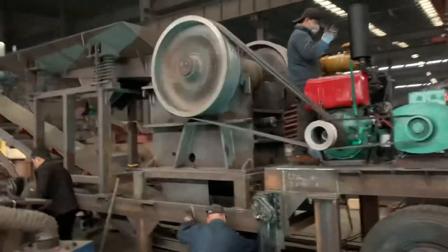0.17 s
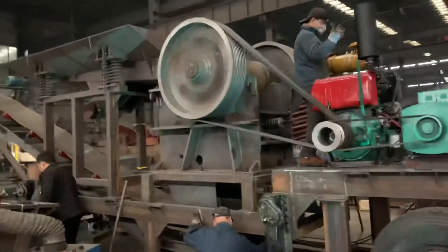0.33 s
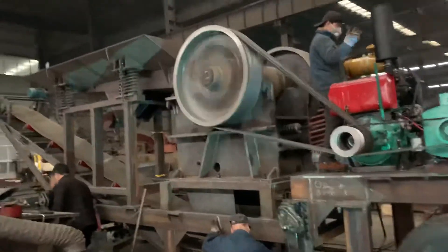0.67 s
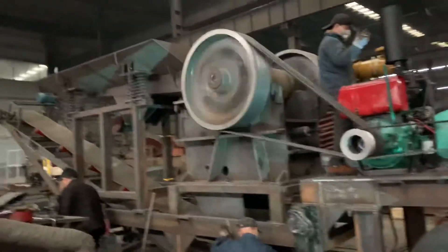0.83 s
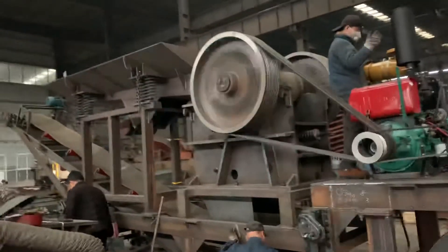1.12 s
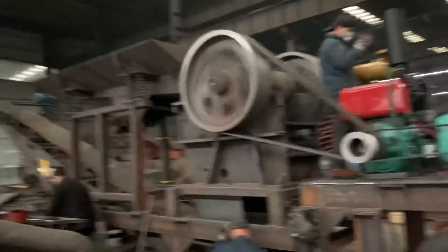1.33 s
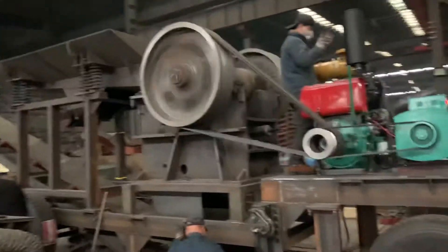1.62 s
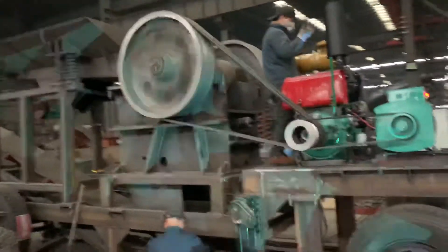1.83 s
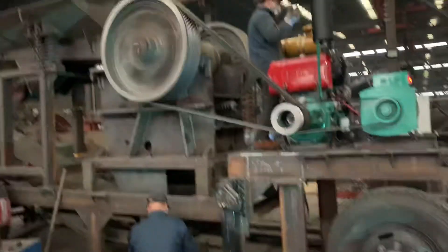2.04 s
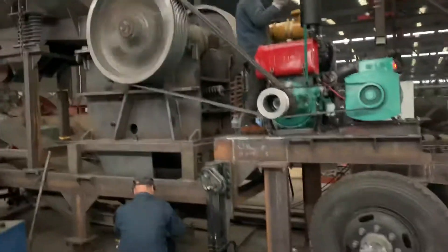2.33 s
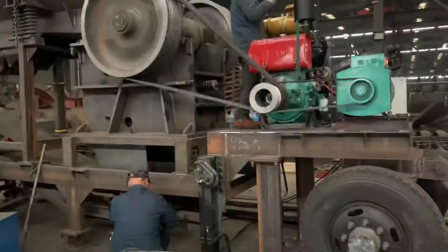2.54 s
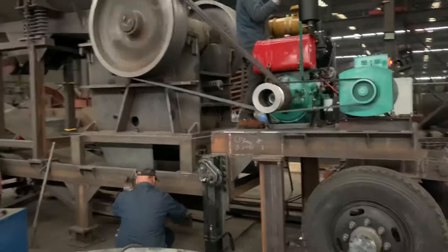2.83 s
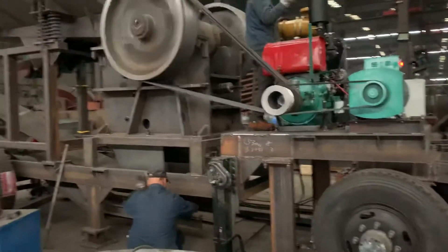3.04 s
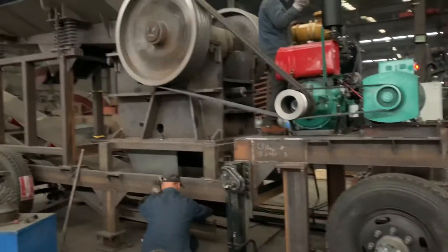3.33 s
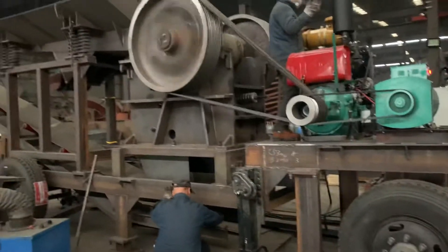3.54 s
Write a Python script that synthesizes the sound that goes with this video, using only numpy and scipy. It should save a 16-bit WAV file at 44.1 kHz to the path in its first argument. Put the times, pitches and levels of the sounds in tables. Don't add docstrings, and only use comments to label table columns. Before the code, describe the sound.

Continuous diesel knocking, valve clatter, motor hum and humming steel plates fill a large workshop; nearby a loose metal part crackles densely at first, falls quiet, snaps again after two seconds, then stops.

```python
import sys
import numpy as np
from scipy import signal
from scipy.fft import rfft, irfft
from scipy.io import wavfile

SR = 44100
rng = np.random.default_rng(int(sys.argv[2]) if len(sys.argv) > 2 else 0)


def persist_wave(psi):
    counts = np.round(np.clip(psi, -1, 1) * 32767).astype(np.int16)
    wavfile.write(sys.argv[1], SR, np.atleast_2d(counts).T)


def attenuation_scalar(level_db):
    decades = np.asarray(level_db, float) / 20
    return 10 ** decades


N = 162288
CYCLE_HZ = 9.821


def rms_one(x):
    return x / np.sqrt(np.mean(x ** 2) + 1e-20)


def in_time(rows):
    return np.interp(np.arange(N) / SR, *np.transpose(rows))


def at_hz(points, hz):
    table_hz, value = np.array(points).T
    return np.interp(np.log(hz + 1), np.log(table_hz + 1), value)


def drift(rate_hz):
    r = np.exp(-80 * np.pi * rate_hz / SR)
    slow = signal.lfilter([1], [1, -2 * r, r * r], rng.standard_normal(N // 40 + 2002))[2000:]
    return np.interp(np.arange(N) / 40, np.arange(len(slow)), rms_one(slow))


def colour(white, points):
    hz = np.arange(N // 2 + 1) * SR / N
    octaves_outside = np.abs(np.log2(np.clip(hz + 1, points[0][0], points[-1][0]) / (hz + 1)))
    gain = attenuation_scalar(at_hz(points, hz) - 120 * octaves_outside) * np.sqrt(SR / 2)
    return irfft(rfft(white) * gain, N)


def resonate(x, hz, width_hz):
    r = np.exp(-np.pi * width_hz / SR)
    poles = [1, -2 * r * np.cos(2 * np.pi * hz / SR), r * r]
    return signal.lfilter([(1 - r * r) / 2, 0, (r * r - 1) / 2], poles, x + 1e-18)


def die_away(x, t60_s):
    return signal.lfilter([1], [1, -attenuation_scalar(-60 / (t60_s * SR))], x + 1e-18)


def tones(base_hz, rows, turn):
    t = np.arange(N) / SR
    out = np.zeros(N)
    for multiple, rms_db, db_per_s in rows:
        level_db = rms_db + db_per_s * (t - t.mean()) + 0.8 * drift(1)
        phase = 2 * np.pi * np.round(multiple) * (base_hz * t + turn)
        out += np.sqrt(2) * attenuation_scalar(level_db) * np.sin(phase)
    return out


CYLINDER_DB = [3.5, 0, 1, -3.5]


def firings():
    first_s, jitter_db = .091, 2
    k = np.arange(int((N / SR + 1 - first_s) * CYCLE_HZ * 4))
    at = ((k / CYCLE_HZ / 4 + first_s) * SR).astype(int)
    out = np.zeros((4, N + SR))
    out[k % 4, at] = attenuation_scalar(np.array(CYLINDER_DB)[k % 4] + jitter_db * rng.standard_normal(len(k)))
    return out


def gated_noise(fire, spectrum, share):
    puff_s, patchy_db = 0.016, .6
    r = np.exp(-1 / (puff_s * SR))
    puff = signal.lfilter([1], [1, -r], fire.sum(axis=0))[SR:]
    gain = (1 - share + share * puff / puff.mean()) * attenuation_scalar(patchy_db * drift(3.1))
    return colour(rms_one(gain * rng.standard_normal((2, N))), spectrum)


# frequency in Hz, level in dB per Hz.
ROAR = [(33, -56), (68, -56), (82, -45), (165, -47), (200, -47), (380, -53.5), (520, -56), (1350, -61)]


def roar(fire):
    return gated_noise(fire, ROAR, share=0.017)


# multiple of the motor rate, rms level in dB, change in dB per second.
HUM = [(1, -36.5, 1.7), (2, -30.5, 0), (3, -42, 1), (5, -41.5, -0.5)]


def motor_hum():
    return -tones(49.73, HUM, turn=.2)


# frequency in Hz, width in Hz, rms level in dB.
PLATES = [(144.6, 5.4, -42), (304, 29, -35), (348.7, 6.5, -38.5), (541.7, 17.5, -38.5), (631, 22, -43),
          (709, 20, -39.5), (787.5, 6.9, -38), (1021, 63, -38.5), (1137, 9, -42.5), (1187, 8.3, -41.5),
          (1302, 31, -37), (1407, 3.3, -48), (1710, 110, -47.5), (2290, 110, -43.5)]


def plates():
    shake = rng.standard_normal((2, N))
    out = np.zeros((2, N))
    for hz, width_hz, rms_db in PLATES:
        wide_hz = width_hz * 1.7
        hum = resonate(resonate(shake, hz, wide_hz), hz, wide_hz)
        out += attenuation_scalar(rms_db - 0.5 * drift(0.88)) * rms_one(hum)
    return out


# multiple of the engine cycle, rms level in dB, change in dB per second.
EXHAUST = [(4, -41, 0.5), (8, -36, -0.5), (12, -29, 1.2), (14, -36.5, -2), (15, -38, 4), (16, -32.5, -0.2),
           (20, -39.5, 3), (32, -43, -1), (36, -39, -2.1), (38, -40.5, 0), (45, -44.5, -1), (56, -38.5, 1),
           (60, -38, 0.5)]


def exhaust():
    return tones(CYCLE_HZ, EXHAUST, turn=.1145)


# frequency in Hz, level in dB per Hz.
KNOCK = [(120, -60), (300, -58.5), (600, -58.5), (1300, -57.5), (1550, -64.5), (2300, -66), (3000, -68.5),
         (5000, -90)]


def knock(fire):
    hall_t60_s, direct_db, shared_path = 0.93, -13, 0.22
    t = np.arange(SR) / SR
    own = rng.standard_normal((2, 4, SR))
    shared = shared_path * rng.standard_normal((2, 1, SR))
    echo = (own + shared) * attenuation_scalar(-60 * t / hall_t60_s)
    echo /= np.sqrt(np.sum(echo ** 2, axis=2, keepdims=True))
    echo[..., 0] += attenuation_scalar(direct_db)
    ringing = signal.fftconvolve(fire[None], echo, axes=2).sum(axis=1)
    return colour(rms_one(ringing[:, SR:SR + N]), KNOCK)


# frequency in Hz, level in dB per Hz.
CLATTER = [(1350, -62), (1550, -61.5), (2300, -62), (2900, -68.5), (4500, -74.5), (5900, -82.5),
           (8200, -82), (15500, -89)]


def clatter(fire):
    return gated_noise(fire, CLATTER, share=0.25)


# start in seconds, pitch in Hz, peak level in dB.
PINGS = [
    (.641, 3800, -23),
    (2.227, 7700, -36),
    (2.85, 3700, -29),
    (.876, 3600, -31),
]


def pings():
    t = np.arange(N) / SR
    out = np.zeros(N)
    for s, hz, peak_db in PINGS:
        fade = attenuation_scalar(peak_db - 60 * np.maximum(t - s, 0) / .04)
        out += (t > s) * fade * np.sin(2 * np.pi * hz * (t - s))
    return out


# frequency in Hz, width in Hz, level in dB.
SNAP_RINGS = [(7520, 2200, -3), (8500, 530, 5), (9800, 1700, 4.5), (11500, 1500, -2.5), (12800, 2300, -8),
              (15000, 810, -12)]
# time in seconds, rms level in dB.
SIZZLE = [(0, -40.5), (.3, -50), (.36, -41), (.66, -43), (.95, -53), (1.15, -42), (1.3, -56), (2.05, -55),
          (2.25, -46), (2.28, -39), (2.37, -33), (2.5, -60), (2.6, -70)]


def sizzle():
    contacts_per_s = 2300
    sizes = attenuation_scalar(2.5 * np.minimum(rng.exponential(1, N), 4)) * (rng.random(N) < contacts_per_s / SR)
    grit = (sizes + 0.15) * rng.standard_normal((2, N))
    out = attenuation_scalar(-3) * resonate(grit, 13200, 3500)
    for k, (hz, width_hz, db) in enumerate(SNAP_RINGS):
        out += (-1) ** k * attenuation_scalar(db) * resonate(grit, hz, width_hz)
    return attenuation_scalar(in_time(SIZZLE)) * rms_one(out)


# start in seconds, peak level in dB, pitch in Hz.
THUDS = [(0.396, -17, 3000), (0.519, -21, 3300), (0.6021, -8, 2680), (0.6072, -13, 3000),
         (.8985, -26, 2800), (1.193, -26, 2800), (1.229, -19, 3800), (2.0636, -9.5, 3670),
         (2.066, -16, 3300), (2.1035, -24, 3500), (2.298, -23, 3500)]


def thuds():
    width_hz, rattle_t60_s, rattle_gain = 2400, .03, .3
    t = np.arange(SR // 20) / SR
    out = np.zeros((2, N))
    for s, peak_db, hz in THUDS:
        rattle = rattle_gain * attenuation_scalar(-60 * t / rattle_t60_s) * rng.standard_normal((2, len(t)))
        blow = (t == 0) * SR / (2 * np.pi * width_hz) + rattle
        ring = resonate(resonate(blow, hz, width_hz), hz, 2 * width_hz)
        start = int(s * SR)
        out[:, start:start + len(t)] += 2 * attenuation_scalar(peak_db) * ring
    return out


# start in seconds,
# peak level in dB, low modes in dB, high modes in dB, tail in dB (all three against the peak).
SNAPS = [(0.0087, -29, -5, -7, -18), (0.0605, -20, -9, -8, -16), (0.0763, -5.5, -6, -8, -31),
         (0.0812, -32, -4, 3, -16), (0.0873, -27, -4, -2, -16), (0.2015, -25.5, -10, -11, -19),
         (0.2427, -17, -6, -7, -23), (0.2695, -13, -12, -11, -21), (0.2756, -33, -10, -3, -14),
         (0.3149, -16, -6, -11, -23), (0.3494, -25, 8, -10, -12), (0.362, -12, 0, -8, -19),
         (0.3722, -26, -6, -4, -14), (0.3991, -9.5, 1, -10, -20), (0.4049, -26, -4, -8, -16),
         (0.4122, -27, -6, -4, -16), (0.471, -30, -5, -9, -16), (0.4872, -12, -8, -8, -23),
         (0.4936, -28, -1, -4, -16), (0.5208, -7.5, 0, -8, -17), (0.527, -26, 2, -4, -16),
         (0.5344, -24, -4, -12, -16), (0.5429, -34, -3, -6, -16), (0.6047, -9.5, 4, -9, -17),
         (0.6106, -26, 2, -8, -14), (0.6182, -28, -4, -8, -9), (0.6885, -26, -6, -11, -14),
         (0.7105, -21, -9, -8, -16), (0.7219, -26, -5, -15, -16), (0.7334, -31, -1, -10, -16),
         (0.7385, -15.5, -11, -10, -27), (0.771, -28, -9, -7, -19)]
LATE_SNAPS = [(0.8801, -28, -12, -7, -16), (0.9002, -15.5, -12, -6, -17), (0.9906, -29, -9, -8, -16),
              (1.0121, -27, -8, -12, -16), (1.0254, -19.5, -14, -10, -21), (1.0476, -17, -11, -9, -24),
              (1.0987, -15.5, -15, -6, -22), (1.1121, -19, -7, -10, -21), (1.1296, -20, -6, -9, -24),
              (1.1574, -18.5, -7, -11, -25), (1.1953, -6.5, -18, -8, -27), (1.2075, -23, -7, -5, -14),
              (1.2313, -11.5, -13, -10, -24), (2.0659, -8.5, 5.5, -1, -13), (2.0713, -26, 0, 3, -18),
              (2.0789, -22, -10, -12, -14), (2.1038, -25, 5, -2, -8), (2.2324, -36, 3, -9, -16),
              (2.2656, -26, 4, -5, -14), (2.2993, -22, 0, -1, -13), (2.3161, -27, -4, 0, -14),
              (2.3269, -27, -1, -4, -12), (2.3661, -20, 2, -11, -14), (2.4022, -32, 0, -2, -16),
              (2.4211, -27, 4, -7, -16), (2.448, -29, -4, -4, -16), (2.4746, -20, -2, -8, -15)]
# frequency in Hz, width in Hz, level in dB.
SNAP_MODES = [
    [(9440, 700, -3), (10020, 490, -3), (10570, 720, -6.5), (11400, 910, -8.5)],
    [(6600, 1800, -26), (7730, 1100, -15), (8670, 350, -1.5)],
    [(11950, 600, -3), (13100, 900, -3), (13900, 640, -6), (15000, 800, -24)],
]


def snaps():
    s, peak_db, low_db, high_db, tail_db = np.transpose(list(SNAPS) + list(LATE_SNAPS))
    at = (s * SR).astype(int)
    strikes = [(0, 0), (-.0024, -21), (.0016, -15)]
    scatter_noise, tail_noise = rng.standard_normal((2, 2, N))
    out = np.zeros((2, N))
    for family, share_db in zip(SNAP_MODES, [0 * s, low_db, high_db]):
        family_db = peak_db + share_db
        scatter, tail = np.zeros((2, N))
        scatter[at] = attenuation_scalar(family_db - 1.5)
        tail[at] = attenuation_scalar(family_db + tail_db + 8.5)
        rattle = die_away(scatter, 0.013) * scatter_noise + die_away(tail, 0.075) * tail_noise
        for hz, width_hz, db in family:
            blows = np.zeros(N)
            for lag_s, lag_db in strikes:
                uneven_db = rng.normal(0, 2, len(s))
                blows[at + int(lag_s * SR)] = attenuation_scalar(family_db + lag_db + uneven_db)
            sharp = blows * SR / (2 * np.pi * width_hz)
            out += attenuation_scalar(db) * resonate(sharp + rattle, hz, width_hz)
    return out


# time in seconds, level in dB.
NEARNESS = [
    (0, -1),
    (.9, -.5),
    (1.8, 0.5),
    (2.7, 0),
    (3.68, .5),
]


def scene():
    fire = firings()
    machine = roar(fire) + plates() + knock(fire) + clatter(fire)
    machine[0] += motor_hum() + exhaust() + pings()
    nearness = attenuation_scalar(in_time(NEARNESS) + .4 * drift(14))
    return machine * nearness + sizzle() + thuds() + snaps()


def low_pass(x):
    return signal.sosfilt(signal.butter(12, 16470, fs=SR, output="sos"), x)


# frequency in Hz, likeness from 0 to 1.
LIKENESS = [(100, 0.95), (600, 0.91), (1400, 0.49), (1900, 0.64), (2700, 0.67), (6000, 0.54), (7000, .99),
            (16000, 1)]
# frequency in Hz, left over right in dB.
TILT = [(150, -0.07), (400, -0.5), (700, 4.5), (1300, 7), (2400, 4.5), (5000, 9.5), (6000, 9.5),
        (7000, 0.6)]
# frequency in Hz, lead in radians.
LEAD = [(0, 0), (500, -.3), (1200, .4), (1550, 1.6), (2450, -2.2), (3000, -1.8), (7100, 6.3), (16400, 24.9)]


def record(dry):
    hz = np.arange(N // 2 + 1) * SR / N
    left, other = rfft(dry)
    alike = np.clip(at_hz(LIKENESS, hz), 0, 1)
    lead = np.exp(1j * np.interp(hz, *np.transpose(LEAD)))
    right = alike * left * lead + np.sqrt(1 - alike ** 2) * other
    right = right * attenuation_scalar(-at_hz(TILT, hz))
    ports = irfft([left, right], N)
    soft = .95 * np.tanh(ports / .95)
    top_cut = signal.cheby2(12, 50, 16000 * 1.04, fs=SR, output="sos")
    mix = signal.sosfilt(top_cut, soft)
    return low_pass(mix)


dry = scene()
out = record(dry)
persist_wave(out)
```